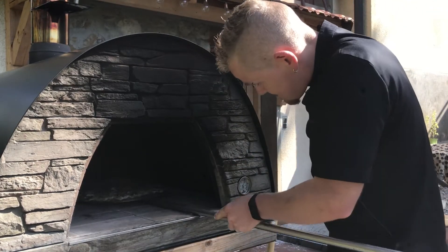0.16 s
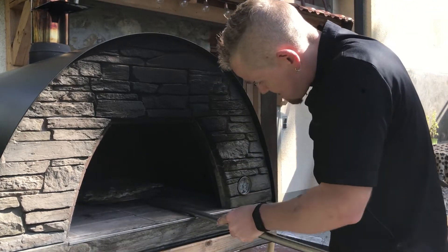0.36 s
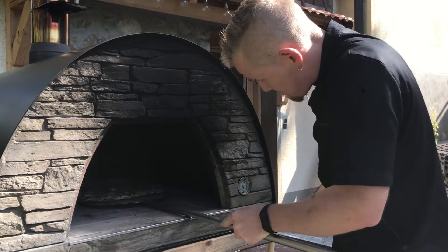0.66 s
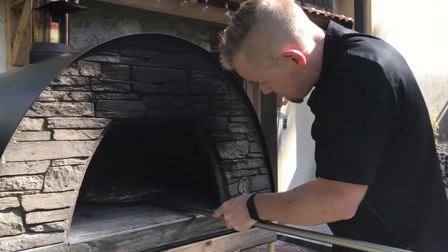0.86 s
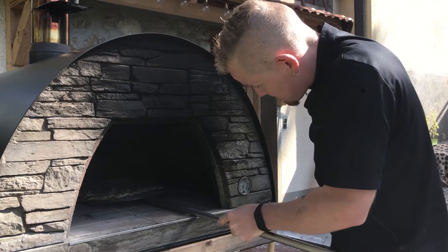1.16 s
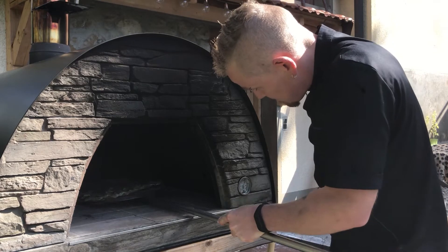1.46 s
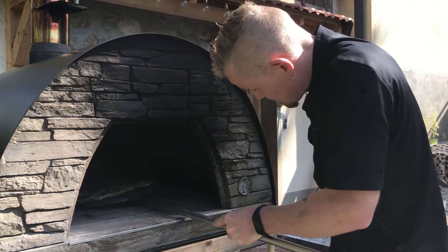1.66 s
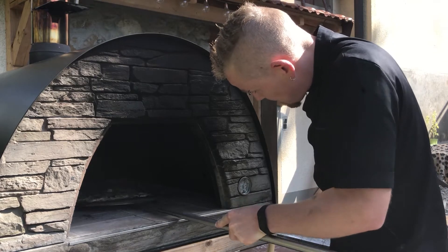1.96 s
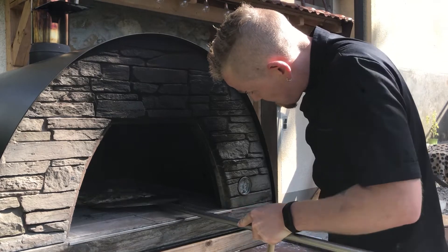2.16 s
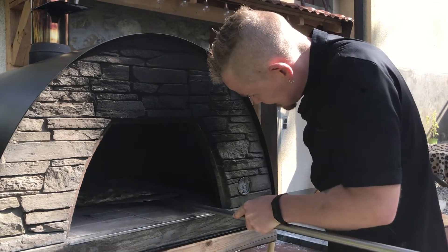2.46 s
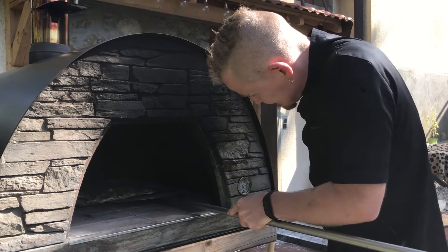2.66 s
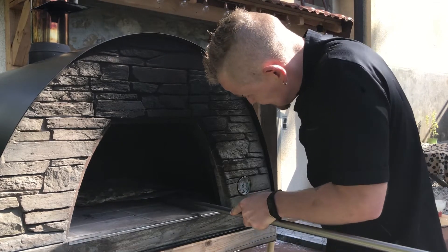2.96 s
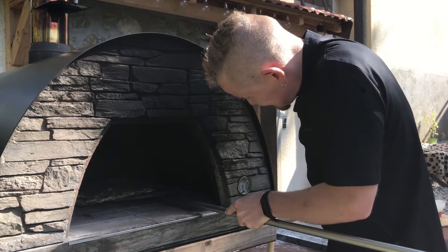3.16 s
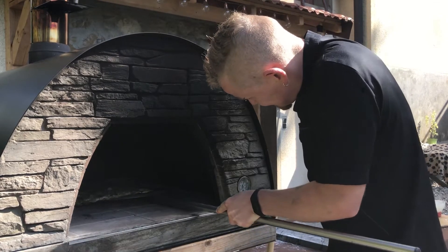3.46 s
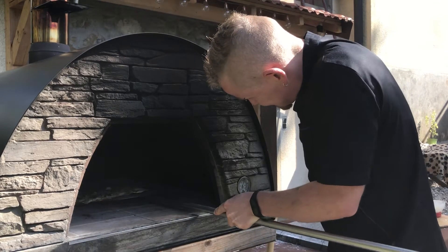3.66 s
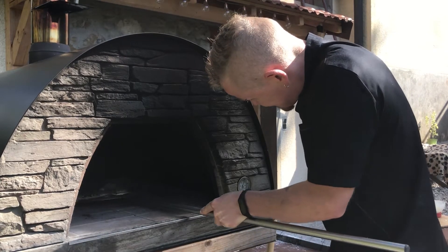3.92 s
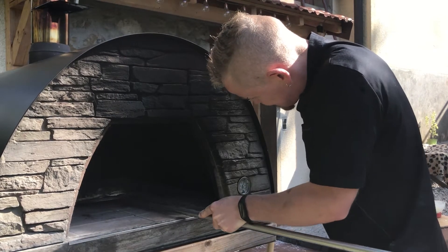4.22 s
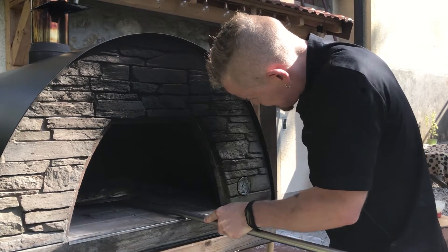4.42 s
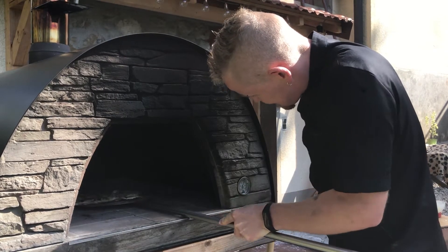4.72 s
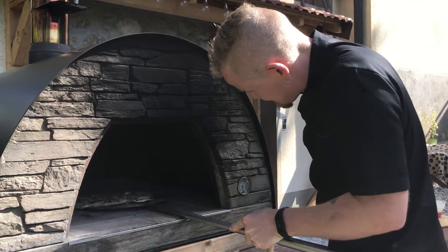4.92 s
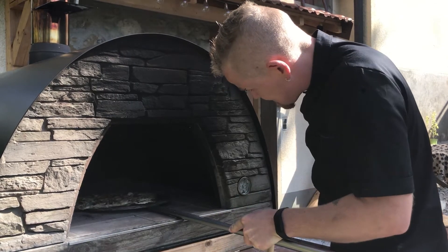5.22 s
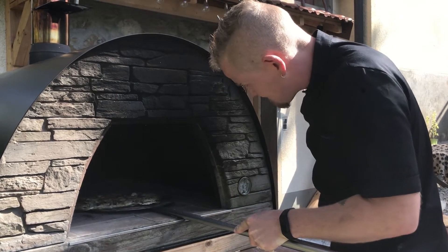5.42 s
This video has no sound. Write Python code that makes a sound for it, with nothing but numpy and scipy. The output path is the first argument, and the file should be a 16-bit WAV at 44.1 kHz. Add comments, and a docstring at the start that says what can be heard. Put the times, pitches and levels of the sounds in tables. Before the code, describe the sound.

A metal peel works over the gritty stone floor of an oven outdoors, heard close and fairly dry, with a short vault tail. A faint wavering low hum and quiet air run throughout. It opens with a brief faint scuff, a dull knock at 0.14 s and a soft scrape from 0.3 to 0.6. A loud double rasp with a bright clack hits at 0.85-0.9, then it is nearly quiet until 1.55. Strong grainy scrapes run from 1.6 to 1.85 and 2.0 to 2.25, with a narrow squeal near 2.2, easing into a steadier slide until 2.7 and a dull thump. Small scuffs and taps follow from 2.85 to 3.6. At 3.63-3.78 come sharp clacks, the second brightest, then a strong squeaky scrape around 3.9. After a click at 4.04 it is sparse; a thin slide with a tap and high squeal fills 4.7-5.0, a bright click at 5.14, then near stillness and a faint scuff at 5.5.

```python
"""A wood-fired oven with a stone floor and an answering vault: a long metal peel is pushed and pulled in strokes.
Random grit catches under the blade and excites its noisy plate ring, its clear modes and the vault's short tail.
Filtered clicks and chatter make blows on the stone; narrow resonances of noise make brief squeals.
Underneath lie a faint hum of resonated noise, quiet outdoor air and a few dull thumps of wavering sines.
The microphone takes little deep bass and no extreme top."""
import sys
import numpy as np
from scipy import signal
from scipy.fft import rfft, irfft
from scipy.io import wavfile
from scipy.ndimage import uniform_filter1d, map_coordinates

SR = 44100
rng = np.random.default_rng(int(sys.argv[2]) if len(sys.argv) > 2 else 0)


def waveform_to_disk(signal):
    """Save audio, clipped to [-1, 1], as 16-bit WAV at the path in sys.argv[1]."""
    frames = np.transpose(np.atleast_2d(signal))
    scaled = np.clip(frames, -1, 1) * 32767
    samples = np.round(scaled).astype(np.int16)
    wavfile.write(sys.argv[1], SR, samples)


N = 246254
TIME = np.arange(N) / SR  # s

# Resonances of the low hum, levels ahead of the microphone:
# (centre [Hz], width of one of two equal stages [Hz], rms level [dB])
HUM_RESONANCES = [(107.2, 12.2, -57), (167.7, 26.7, -56), (87, 26, -67), (235, 96, -68.5), (381.5, 29, -73)]
# Spectral shape of the outdoor air: (frequency [Hz], relative level [dB])
AIR_COLOUR = [(150, 3), (380, 1), (600, -9), (1200, -15), (2500, -9.5), (4500, -22.5), (9000, -35.5),
              (10300, -52), (13000, -22), (16000, -28)]
# Strokes of the peel; flex and edge hiss are relative to the plate ring:
# (full contact [s], attack [s], hold [s], release [s], level [dB], change over the hold [dB],
#  flex of the blade [dB], hiss of its edge [dB])
PEEL_STROKES = [(0.0, .02, 0.0044, 0.044, -41.5, -4.5, -6, 0),
                (0.135, .028, 0.13, .059, -62.5, -4.5, 7.5, -5),
                (0.321, 0.034, .063, .055, -55, 5, -19, 3.5),
                (0.416, 0.077, 0.2, 0.098, -44, -13.5, -20, 3.5),
                (0.744, 0.11, 0.0071, 0.026, -56.5, 2, -10.5, -1.5),
                (0.837, 0.033, 0.025, 0.053, -28.5, -0.5, -25.5, 3.5),
                (0.894, .04, 0.014, 0.021, -26.5, 0, -18.5, -1.5), (.957, .04, .008, .045, -53, -3, -17, 0),
                (1.021, 0.032, .01, 0.092, -53, 1, -13, 0), (1.102, 0.055, 0.053, .056, -60.5, -6, 4, -9),
                (1.186, .083, .12, .06, -57, -16.5, -8.5, -5.5),
                (1.575, 0.054, .023, .056, -48, 4, -19, -10),
                (1.623, 0.042, 0.051, 0.083, -33, -1.5, -26, -3),
                (1.731, 0.033, .1, .046, -30, -8, -23, 1.5), (2.04, 0.053, 0.14, .05, -32, -1, -13, 6.5),
                (2.155, .094, 0.065, 0.069, -28, -4, -13, -0.5),
                (2.365, 0.24, .33, .048, -37.5, -7, -22.5, -0.5),
                (2.779, 0.041, .01, .067, -54, -2.5, -17, -8),
                (2.878, 0.042, 0.031, .049, -46.5, -5, -9, 5.5),
                (2.982, 0.059, .01, .051, -51.5, -.5, -10, 6),
                (3.051, 0.012, 0.064, 0.043, -44.5, 5, -15.5, 4.5),
                (3.254, 0.014, 0.048, 0.035, -47.5, 1.5, -18, 7.5),
                (3.354, .04, 0.048, 0.12, -59, -3, -13, 2.5),
                (3.45, 0.026, 0.028, 0.021, -48.5, -1.5, -8, 13),
                (3.514, .037, 0.12, 0.051, -55, 6, -18.5, 11),
                (3.637, 0.024, 0.0055, 0.02, -35.5, 1.5, -18, 2),
                (3.771, 0.058, .07, 0.061, -52.5, 0, -15, 5.5),
                (3.9, 0.066, 0.046, .057, -30, -2.5, -19.5, -0.5),
                (3.953, 0.044, .056, 0.064, -34, -4.5, -17, 6),
                (4.225, .074, 0.23, .055, -58.5, -11, -9.5, -4.5),
                (4.515, 0.11, 0.17, .056, -63.5, 8.5, -10, 6),
                (4.739, 0.06, 0.22, 0.078, -40, 1, -25.5, 1.5),
                (4.987, .051, 0.052, 0.046, -47, -5.5, -12.5, 7.5),
                (5.513, 0.17, 0.057, .055, -58, -6, -3.5, -1)]
# Ranges of the blade's flexing, its plate ring and its edge hiss: (low [Hz], high [Hz])
BLADE_RANGES = [(300, 1050), (1050, 3800), (3800, 19000)]
# Modes of the blade in the vault: (frequency [Hz], level relative to the other modes [dB], t60 [s])
BLADE_MODES = [(384, 2.5, .15), (510, 1, 0.24), (572, 11, 0.064), (700, 8, 0.11), (813, 3.5, 0.089),
               (934, -4.5, 0.2), (1106, 6, 0.062), (1150, 5.5, 0.087), (1256, 7, .11), (1580, -13, 0.075),
               (1650, -16.5, 0.12), (1790, 1.5, 0.11), (2092, 2.5, 0.23), (2263, 3.5, 0.13),
               (2260, -21, .16), (2372, 4.5, 0.14), (2708, 7.5, 0.023), (3050, 4, 0.13), (3089, 7, 0.033),
               (3640, -22, .11), (3884, 8, 0.066), (4230, 5, 0.076), (4636, 5, 0.18), (5290, 1.5, .1),
               (7760, 1.5, 0.055), (9300, -5.5, 0.065)]
# Colour of steel on stone: (frequency [Hz], gain [dB])
STEEL_COLOUR = [(300, -10.5), (650, -10.5), (950, -1.5), (1200, 1.5), (2200, 2.5), (4000, 2), (5700, 3),
                (6500, -2.5), (7500, 0.5), (9200, 1.5), (10100, -8), (11500, -11), (12800, -4.5),
                (15800, -16.5)]
# Blows of the blade on the stone, soft ones dull and hard ones bright; peaks ahead of the microphone:
# (time [s], peak level [dB], low edge [Hz], high edge [Hz], chatter decay to 1/e [s])
STONE_BLOWS = [(0.14, -27.5, 550, 5070, 0.0059), (.144, -23, 330, 950, 0.0097),
               (.147, -22.5, 870, 1180, 0.0022), (.855, -17, 2600, 8000, 0.0032),
               (1.027, -37, 3800, 15000, .01), (1.604, -24, 1790, 7000, 0.0095),
               (1.725, -22, 2830, 8100, .008), (3.048, -26, 1400, 5540, 0.0088),
               (3.256, -27, 2220, 8000, .0083), (3.634, -21, 1510, 8330, 0.01),
               (3.716, -40, 2500, 9900, 0.0043), (3.775, -14.5, 3250, 13500, 0.011),
               (4.038, -23.5, 1490, 6000, 0.0043), (4.452, -43, 1180, 12000, 0.0016),
               (4.77, -18, 2400, 7000, 0.0073), (5.142, -23.5, 3910, 10300, 0.016)]
# Dull thumps: (time of the crest [s], rms level at the crest [dB], mean pitch [Hz], bell's sigma [s])
DULL_THUMPS = [(0.181, -48, 235, 0.025), (1.066, -44.5, 166.8, 0.0095), (1.215, -48, 155, 0.01),
               (2.096, -50, 197.4, 0.05), (2.19, -54, 250, 0.033), (2.662, -38, 159, 0.015),
               (2.874, -45.5, 169.6, 0.035), (3.41, -45, 104.5, 0.031), (3.659, -45, 266.4, 0.0073),
               (3.701, -45, 158, 0.037), (5.445, -46, 157.5, 0.023)]
# Moments when the edge sings as it skims the stone; squeals() trims all the levels together:
# (onset [s], level before the trim [dB], centre [Hz], width of one of two equal stages [Hz], rise [s])
EDGE_SQUEALS = [(.352, -41, 1770, 1000, 0.021), (.385, -42.5, 5230, 1000, 0.056),
                (.52, -42, 5160, 1500, .04), (.9, -47.5, 520, 120, 0.021), (1.022, -50.5, 1320, 200, 0.017),
                (2.175, -32.5, 2130, 500, 0.043), (2.33, -36, 1840, 600, 0.023),
                (3.045, -37, 2130, 450, 0.017), (3.249, -49.5, 494, 128, 0.021),
                (3.46, -51.5, 1070, 160, 0.02), (3.535, -40, 3180, 1000, 0.052),
                (3.635, -44, 1150, 300, .018), (3.777, -39, 3050, 700, .024),
                (3.865, -32.5, 8850, 500, 0.029), (3.885, -31.5, 2900, 900, .025),
                (3.925, -51.5, 510, 100, 0.037), (4.5, -53.5, 1260, 400, 0.024),
                (4.552, -46.5, 5500, 900, .03), (4.84, -35, 5400, 600, 0.051),
                (5.136, -42, 4400, 700, 0.014), (5.514, -49, 1240, 320, 0.022)]

AIR_DB = -62.5  # mean of the flickering level
RAMP_DB = 20  # an attack or a release spans this much level
REST_DB = -78.5  # between strokes the blade still creeps on the stone
BASS_CUT_HZ, TOP_HZ = 70, 15900  # limits of the microphone


def undb(db):
    """Decibels to gain."""
    return 10 ** (np.asarray(db) / 20)


def unit(x):
    """Scale to rms 1."""
    return x / np.sqrt(np.mean(x ** 2))


def band(x, low_hz, high_hz):
    """Steep band-pass: two equal stages."""
    sos = signal.butter(2, [low_hz, min(high_hz, .49 * SR)], "band", fs=SR, output="sos")
    return signal.sosfilt(sos, signal.sosfilt(sos, x))


def colour(x, points):
    """Causal filter through (Hz, dB) points, built from the cepstrum."""
    hz, db = np.transpose(points)
    size = 2048
    grid = np.maximum(np.fft.rfftfreq(size, 1 / SR), 1)
    log_gain = np.log(undb(np.interp(np.log(grid), np.log(hz), db)))
    cepstrum = irfft(log_gain)
    # Folding the cepstrum forward gives minimum phase.
    cepstrum[1:size // 2] *= 2
    cepstrum[size // 2 + 1:] = 0
    response = irfft(np.exp(rfft(cepstrum)))
    return signal.fftconvolve(x, response)[:len(x)]


def resonate(x, hz, width_hz):
    """A resonance applied twice, at rms 1."""
    b, a = signal.iirpeak(hz, hz / width_hz, fs=SR)
    once = signal.lfilter(b, a, x)
    return unit(signal.lfilter(b, a, once))


def walk(rate):
    """Smooth chance of spread 1 that changes about rate times a second."""
    k = max(int(SR / rate), 1)
    steps = np.repeat(rng.standard_normal(N // k + 1), k)
    return unit(uniform_filter1d(steps, k)[:N])


def background(flicker_db=1):
    """Noise through resonances makes a wavering low hum; coloured noise makes quiet outdoor air."""
    hum = np.zeros(N)
    for hz, width, db in HUM_RESONANCES:
        # The first second lets the resonance settle and is dropped.
        hum += undb(db) * resonate(rng.standard_normal(N + SR), hz, width)[SR:]
    air = unit(colour(rng.standard_normal(N), AIR_COLOUR))
    return hum + air * undb(AIR_DB + flicker_db * walk(2.6))


def stroke_gains(unsteady_db=0.56, unsteady_rate=40):
    """Gains of flex, plate ring and edge hiss: each stroke builds up, holds as the push grows or eases, and stops."""
    db = np.full((3, N), 1. * REST_DB)
    for s, attack, hold, release, level, change, flex, edge in PEEL_STROKES:
        age = TIME - s
        ramps = np.maximum(-age, 0) / attack + np.maximum(age - hold, 0) / release
        push = level + change * np.clip(age / hold, 0, 1) - RAMP_DB * ramps
        db = np.maximum(db, [push + flex, push, push + edge])  # the strongest stroke rules
    return undb(db + unsteady_db * walk(unsteady_rate))


def grit(rate=2400, spread_db=3.0, judder_db=2, judder_rate=130):
    """Sand grains catch and break under the blade at random, rate a second on average, bunched by stick and slip."""
    catches = (rng.random(N) < rate / SR) * rng.standard_normal(N)
    sizes = undb(spread_db * np.minimum(rng.exponential(size=N), 3))
    judder = undb(judder_db * walk(judder_rate))
    return unit(catches * sizes * judder)


def blade(modes_db, plate_t60=0.073, vault_t60=0.17, vault_db=-11, crack_db=-5):
    """Answer to a catch at one place on the blade: a crack, dense plate modes, clear modes and the vault's tail."""
    t = TIME[:SR // 3]
    fall = -np.log(1000) * t  # 60 dB down when divided by t60
    ring = unit(rng.standard_normal(len(t)) * np.exp(fall / plate_t60))
    ring += undb(vault_db) * unit(rng.standard_normal(len(t)) * np.exp(fall / vault_t60))
    ring += undb(crack_db) * unit(1. * (t == 0))
    for hz, db, t60 in BLADE_MODES:
        tone = np.sin(2 * np.pi * (hz * t + rng.random()))
        ring += undb(modes_db + db) * unit(tone * np.exp(fall / t60))
    return colour(ring, STEEL_COLOUR)


def wander(sound, echo=0.31, lag_s=0.000503, rate=8):
    """The contact travels, so the wave thrown back by the blade's rim combs the sound in shifting places."""
    lag = lag_s * SR * np.exp(0.302 * walk(rate))  # samples, around lag_s
    late = map_coordinates(sound, [np.arange(N) - lag], order=3)
    return (sound + echo * late) / np.hypot(1, echo)


def scraping(rocking_db=2.5, count=12):
    """The blade rocks between several places of contact; each has its own grit and its own ring."""
    gains = stroke_gains()
    loads = np.array([undb(rocking_db * walk(9)) for _ in range(count)])
    loads /= np.linalg.norm(loads, axis=0)  # the places share one weight
    out = np.zeros(N)
    for load in loads:
        force = grit() * load
        ring = blade(modes_db=-30)
        for gain, (low, high) in zip(gains, BLADE_RANGES):
            part = band(ring, low, high)
            out += signal.oaconvolve(force * gain, part / np.linalg.norm(part))[:N]
    return wander(out)


def blows(chatter_db=-2):
    """A first touch and a short chatter; the blade is freer than in a stroke, so its modes ring more clearly."""
    out = np.zeros(N)
    t = TIME[:SR // 3]
    for s, db, low, high, chatter in STONE_BLOWS:
        touch = unit(1. * (t == 0))
        rattle = unit(rng.standard_normal(len(t)) * np.exp(-t / chatter))
        force = touch + undb(chatter_db) * rattle
        ring = blade(modes_db=-26.5, plate_t60=0.023, vault_db=-6.5)
        contact = signal.butter(2, [low, min(high, .45 * SR)], "band", fs=SR, output="sos")
        hit = signal.sosfilt(contact, signal.fftconvolve(force, ring))[:len(t)]
        start = int(s * SR)
        out[start:start + len(t)] += undb(db) * hit / np.abs(hit).max()
    return out


def swell(s, length):
    """Bell-shaped rise and fall around a moment."""
    return np.exp(-.5 * ((TIME - s) / length) ** 2)


def thumps(waver=0.07):
    """Soft low swells, each a sine wavering around one pitch."""
    drift = np.cumsum(1 + waver * walk(60)) / SR  # wavering time, s
    out = np.zeros(N)
    for s, db, hz, length in DULL_THUMPS:
        tone = unit(np.sin(2 * np.pi * hz * (drift + rng.random())))
        out += undb(db) * swell(s, length) * tone
    return out


def squeals(trim_db=-1):
    """Friction feeds one narrow resonance for a moment: it catches quickly and lets go more slowly."""
    force = rng.standard_normal(N)
    out = np.zeros(N)
    for s, db, hz, width, rise in EDGE_SQUEALS:
        age = np.maximum(TIME - s, 0) / rise
        envelope = age * np.exp((1 - age ** 2) / 2)  # reaches 1 after one rise time
        out += undb(db + trim_db) * envelope * resonate(force, hz, width)
    return out


def scene():
    """Strokes, blows and squeals of the peel over the thumps and the low background."""
    return (background() + scraping() + blows() + thumps() + squeals())[None]


def record(dry):
    """The microphone drops the deep bass and cuts the top."""
    bass_cut = signal.butter(4, BASS_CUT_HZ, "high", fs=SR, output="sos")
    top_cut = signal.ellip(10, .2, 70, TOP_HZ, fs=SR, output="sos")  # ripple dB, then rejection dB
    return signal.sosfilt(top_cut, signal.sosfilt(bass_cut, dry))


dry = scene()
out = record(dry)
waveform_to_disk(out)
```